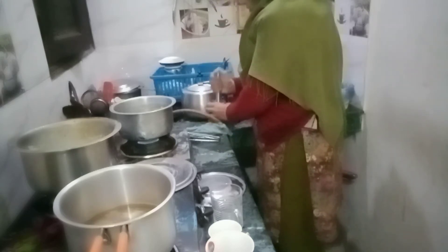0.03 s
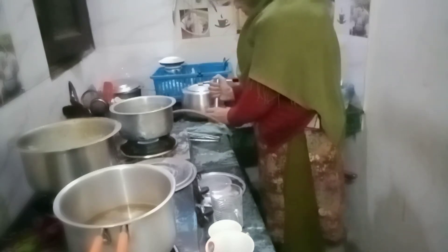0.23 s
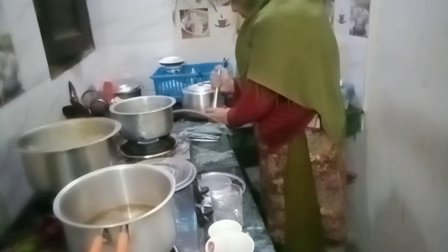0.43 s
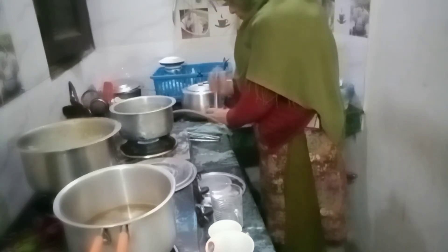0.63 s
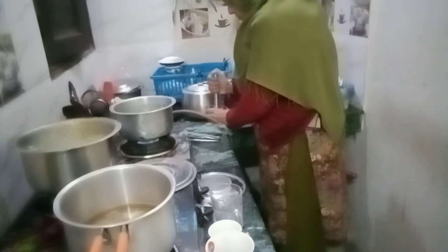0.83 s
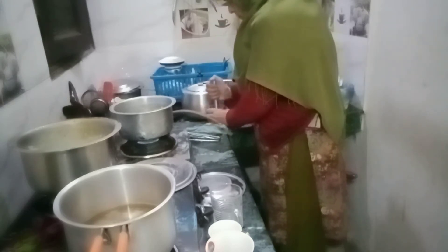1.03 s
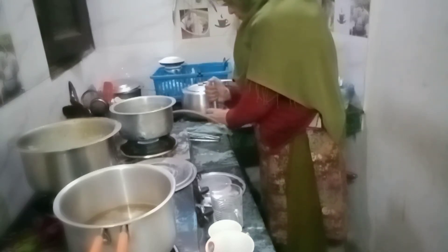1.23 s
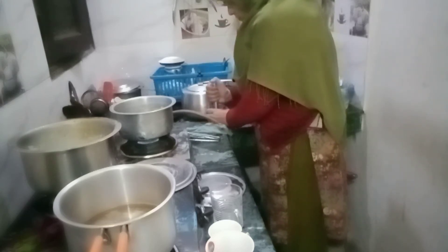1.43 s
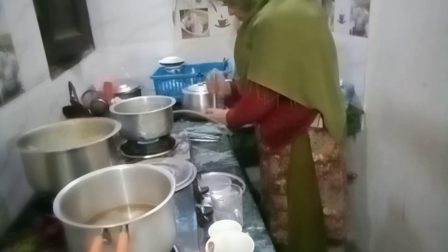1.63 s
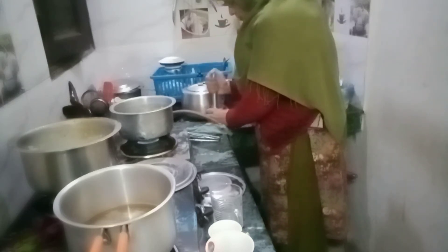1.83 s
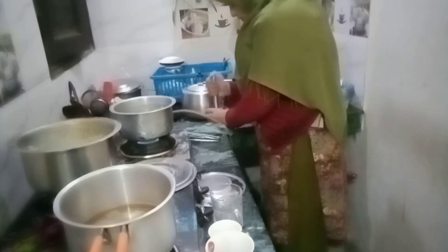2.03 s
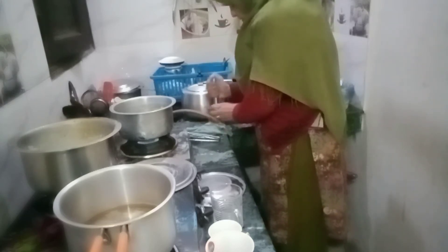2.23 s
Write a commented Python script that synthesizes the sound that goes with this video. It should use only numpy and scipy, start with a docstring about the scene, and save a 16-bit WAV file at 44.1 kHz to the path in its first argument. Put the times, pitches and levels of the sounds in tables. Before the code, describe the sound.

A metal pestle works in a small metal mortar, a couple of metres away. It clinks at 0.1 seconds, knocks hard at 0.2, then clinks twice more. From 0.7 to 2.2 seconds it pounds spices seven times, about four a second: dull thuds with short crunches, three led by clinks between 1.2 and 1.7 seconds. The small tiled kitchen echoes briefly over a faint hum.

```python
"""Pestle and mortar in a kitchen

A metal pestle works in a small metal mortar on a counter, a couple of metres away. It clinks on the
rim and knocks hard once, then pounds spices about four times a second: dull thuds with a short crunch,
some led by a clink on the way down. The small tiled kitchen answers every blow over a faint hum."""
import sys
import numpy as np
from scipy import signal
from scipy.fft import rfft, irfft, next_fast_len
from scipy.io import wavfile

SR = 44100
rng = np.random.default_rng(int(sys.argv[2]) if len(sys.argv) > 2 else 0)


def store_wav(level_fs):
    """Save 16-bit WAV to argv[1]."""
    pcm = np.round(np.clip(np.atleast_2d(level_fs), -1, 1) * 32767)
    wavfile.write(sys.argv[1], SR, pcm.T.astype(np.int16))


N = 101429
HIT_SAMPLES = SR * 3 // 4
T = np.arange(HIT_SAMPLES) / SR

# Room tone spectrum: freq_hz, level_db
AIR_SPECTRUM = [(25, -22), (45, -6.5), (70, -6), (100, -8), (170, 4), (300, -7.5), (600, -10),
                (1200, -13.5), (2500, -17.5), (4000, -26.5), (6500, -21.5), (9000, -32), (13000, -47),
                (15500, -35)]
# Decay of the kitchen's reverb: freq_hz, t60_s
KITCHEN_DECAY = [(100, 0.25), (300, 0.61), (800, 0.22), (2000, .26), (3500, 0.23), (6500, 0.23),
                 (14000, 0.23)]
# Early reflections off the nearest walls: delay_s, gain
WALL_ECHOES = [(.0055, .9), (.0075, .7), (.0108, .6), (.0172, .5)]

# Resonances: pitch_hz, level_db, t60_s
BUMP_MODES = [(169, 0, .55), (116, -10, .3)]  # the counter, softly bumped
THUMP_MODES = [(208.4, -9.5, 0.4), (238, -7.5, 0.39), (261, -4, 0.2), (289, -7, 0.13), (330, -9.5, 0.37),
               (263.2, 2, 0.097)]  # the low thump of a blow, ringing on in the room
BOOM_MODES = [(114.4, 9, 0.6), (115, 5.5, 0.29), (143.7, -1, 0.6)]  # the kitchen's low end
SWELL_MODES = [(134.5, -4.5, 0.12), (194, -7, 0.078)]  # the boom's brief second swell
MORTAR_MODES = [(856, -8, .2), (1003, -3, .2), (1025, -3, .18), (1080, 0, .16), (1118, 2, .17),
                (1213, -2, .2), (1298, -2, .2), (1436, -3, .18), (1490, -6, .22), (1671, -1, .18),
                (1910, -4, .18), (2060, -7, .2), (2519, -5, .2), (2692, -4, .22), (2920, -6, .2),
                (3335, -3, .18)]  # the mortar on the counter
PESTLE_MODES = [(3432, 0, .12), (3465, -8, .26), (3515, -2, .09), (3750, -13, .08), (3930, -18, .08),
                (6850, -7, .012), (9200, -11, .012), (11570, -25, .01), (14240, -19, .012)]  # the pestle, damped by the hand

# Tone colours of the contacts: freq_hz, level_db
CRACK_SPECTRUM = [(50, -65.5), (115, -16.5), (450, -20), (1100, -4), (2200, -10), (3600, -2), (4500, -12.5),
                  (7200, -19), (9000, -37.5), (12500, -48.5), (15500, -45)]  # a hard knock
BITE_SPECTRUM = [(1000, -38), (4500, -29.5), (5700, 3), (6800, 1.5), (7700, -20), (15000, -39.5)]  # first touch of metal on metal
CLICK_SPECTRUM = [(30, -52.5), (150, -30), (400, -14.5), (1000, 1), (1700, -0.5), (2400, 7.5), (3000, 2.5),
                  (3600, 12.5), (4300, -4.5), (5300, -3), (6800, -2), (7700, -27.5), (10500, -34),
                  (15500, -36)]  # pestle on rim
CLACK_SPECTRUM = [(30, -38), (70, -11), (150, 4), (300, 3.5), (410, -0.5), (550, 0), (800, 4.5), (930, -5),
                  (1170, -1), (1550, -6), (1900, -14), (2600, -6), (4000, -26), (10000, -37)]  # pestle into the filled bowl
CRUNCH_SPECTRUM = [(300, -25), (1500, -23.5), (3000, -6), (5000, 1), (6500, 6), (8500, -4), (11000, -7),
                   (13200, -10), (15400, 4), (16500, 5.5)]  # grains breaking

# The mortar is knocked and rocks: start_s, level_db, tilt_db_per_octave
KNOCK_CUES = [(.2230, -30, 0), (0.2279, -25.5, -0.5), (0.384, -43, 2), (0.39, -49, 0.5), (0.535, -51, 0.5)]
# Pestle on rim: start_s, click_db, click_tilt_db_per_octave, ring_db, middle_boost_db, top_boost_db
CLINK_CUES = [(.0970, -38.5, 1.5, -37.5, 10, -14), (0.3429, -34.5, -1, -31, -8.5, 8),
              (0.4959, -41.5, -2.5, -42.5, 8.5, 16), (1.2150, -40, -0.5, -35.5, 2.5, 2),
              (1.4412, -39.5, -0.5, -36, 9, 10), (1.687, -43, -1.5, -41, 3.5, 2)]
# Pestle into spices: start_s, boom_db, thump_db, clack_db, ring_db, crunch_db, crunch_tilt_db_per_octave
POUND_CUES = [(0.7453, -46.5, -44.5, -39.5, -41.5, -48, 0.5), (1.0075, -51, -49.5, -45.5, -52.5, -53, -7),
              (1.2589, -44, -36.5, -40, -44, -44.5, -2.5), (1.5040, -43, -33, -41.5, -49.5, -47.5, -2.5),
              (1.7460, -44, -34.5, -41, -45.5, -43.5, -6), (1.9840, -44, -33.5, -46.5, -48.5, -43, -1),
              (2.201, -51, -44, -49, -75.5, -47.5, -1)]

AIR_DB, HUM_DB, HUM_HZ = -60, -64, 100
TAIL_DB, TAIL_RISE_S = 8.5, 0.0013  # reverb tail, ahead of each sound's wet_db send
BUMP_S, BUMP_DB = 0.1, -55
RING_RISE_S = 0.0015
MORTAR_VS_CRACK_DB, BITE_VS_CLICK_DB = -3, -11.5
CUSHION_HZ = 1300  # the spices soften the blow above this
PRESSED_DECAY = 0.44  # share of the mortar's ring time left while the pestle presses on it
SWELL_DELAY_S, SWELL_VS_BOOM_DB = 0.077, -1
RUMBLE_CUT_HZ, BAND_LIMIT_HZ = 80, 15850


def amp(db):
    """Decibels to gain."""
    return 10 ** (np.asarray(db) / 20)


def curve_at(points, hz):
    """Read a (freq_hz, value) curve on a log frequency axis."""
    freqs, values = np.transpose(points)
    return np.interp(np.log(hz + 1), np.log(freqs + 1), values)


def tilted(spectrum, db_per_octave):
    """Tilt EQ: a spectrum made brighter or duller."""
    return [(hz, db + db_per_octave * np.log2(hz / spectrum[0][0])) for hz, db in spectrum]


def unit_hit(x):
    """Scale a hit to rms 1 over its first 50 ms."""
    return x / np.sqrt(np.mean(x[:SR // 20] ** 2) + 1e-20)


def add(track, start_s, x):
    """Mix x into the track at its cue."""
    part = track[round(start_s * SR):][:len(x)]
    part += x[:len(part)]


def contact(spectrum):
    """One transient: the tightest causal pulse with this spectrum."""
    size = 4096
    gains = amp(curve_at(spectrum, np.fft.rfftfreq(size, 1 / SR)))
    cepstrum = irfft(np.log(gains))
    cepstrum[1:size // 2] *= 2  # fold to minimum phase
    cepstrum[size // 2 + 1:] = 0
    return irfft(np.exp(rfft(cepstrum)))


def shower(spectrum, t60_s, spikiness):
    """A dying shower of tiny contacts, all of one colour."""
    noise = rng.standard_normal(HIT_SAMPLES)
    envelope = np.exp(spikiness * rng.standard_normal(HIT_SAMPLES) - np.log(1000) * T / t60_s)
    return signal.fftconvolve(noise * envelope, contact(spectrum))


def ring(modes, rise_s, scatter_db):
    """Damped modes, struck with a slightly different balance each time."""
    hz, db, t60 = np.transpose(modes)[:, :, None]
    level = amp(db + scatter_db * rng.standard_normal(db.shape))
    partials = level * np.exp(-np.log(1000) * T / t60) * np.sin(2 * np.pi * hz * T)
    return partials.sum(0) * (1 - np.exp(-T / rise_s))


def room_tone():
    """The bed: soft, dark noise and an electrical hum."""
    colour = amp(curve_at(AIR_SPECTRUM, np.fft.rfftfreq(N, 1 / SR)))
    air = irfft(rfft(rng.standard_normal(N)) * colour, N)
    hum = np.sqrt(2) * np.sin(2 * np.pi * HUM_HZ * np.arange(N) / SR)
    return amp(AIR_DB) * air / air.std() + amp(HUM_DB) * hum


def kitchen(x, wet_db):
    """A hit in the tiled room: direct sound, wall echoes and a diffuse tail, scaled to unit level."""
    hz, t, noise = signal.stft(rng.standard_normal(HIT_SAMPLES), SR, nperseg=256)
    decay = np.exp(-np.log(1000) * t / curve_at(KITCHEN_DECAY, hz)[:, None])
    tail = signal.istft(noise * decay, SR, nperseg=256)[1][:HIT_SAMPLES]
    tail *= 1 - np.exp(-T / TAIL_RISE_S)
    response = amp(TAIL_DB) * tail / np.linalg.norm(tail)
    for delay_s, gain in WALL_ECHOES:
        delay_s *= 1 + 0.04 * rng.standard_normal()
        response[round(abs(delay_s) * SR)] += gain
    response *= amp(wet_db)
    response[0] += 1  # direct sound
    return unit_hit(signal.fftconvolve(x, response)[:HIT_SAMPLES])


def counter_bump():
    """The counter booms faintly as the work begins."""
    out = np.zeros(N)
    add(out, BUMP_S, amp(BUMP_DB) * unit_hit(ring(BUMP_MODES, rise_s=0.015, scatter_db=3.5)))
    return out


def mortar_knocks():
    """Each knock is a broad crack that sets the mortar ringing."""
    out = np.zeros(N)
    for start_s, level_db, tilt in KNOCK_CUES:
        crack = kitchen(contact(tilted(CRACK_SPECTRUM, tilt)), wet_db=-1)
        body = kitchen(ring(MORTAR_MODES, RING_RISE_S, scatter_db=1), wet_db=-14)
        add(out, start_s, amp(level_db) * (crack + amp(MORTAR_VS_CRACK_DB) * body))
    return out


def rim_clinks(middle_hz=5000, top_hz=10500):
    """Metal on metal: bite, click and the pestle's short ring, its overtones set by where it lands."""
    out = np.zeros(N)
    for start_s, click_db, tilt, ring_db, middle_db, top_db in CLINK_CUES:
        bite = shower(BITE_SPECTRUM, t60_s=0.0079, spikiness=0.16)
        add(out, start_s, amp(click_db + BITE_VS_CLICK_DB) * kitchen(bite, wet_db=-22.5))
        click = contact(tilted(CLICK_SPECTRUM, tilt))
        add(out, start_s, amp(click_db) * kitchen(click, wet_db=3.5))
        modes = [(hz, db + (top_db if hz > top_hz else middle_db if hz > middle_hz else 0), t60)
                 for hz, db, t60 in PESTLE_MODES]
        pestle = ring(modes, RING_RISE_S, scatter_db=1)
        add(out, start_s, amp(ring_db) * kitchen(pestle, wet_db=-5))
    return out


def thud(modes, rise_s):
    """The weight of a blow: low modes with the sub rolled off, at unit level."""
    low_cut = signal.butter(4, RUMBLE_CUT_HZ, "highpass", fs=SR, output="sos")
    return unit_hit(signal.sosfilt(low_cut, ring(modes, rise_s, scatter_db=1)))


def pounding():
    """Each cushioned blow thumps low, booms on in the room, clacks the bowl and crushes grains."""
    out = np.zeros(N)
    cushioned = [(hz, db - 10 * np.log10(1 + (hz / CUSHION_HZ) ** 6), t60 * PRESSED_DECAY)
                 for hz, db, t60 in MORTAR_MODES]
    for start_s, boom_db, thump_db, clack_db, ring_db, crunch_db, tilt in POUND_CUES:
        grains = shower(tilted(CRUNCH_SPECTRUM, tilt), t60_s=0.053, spikiness=1.34)
        add(out, start_s, amp(thump_db) * thud(THUMP_MODES, rise_s=0.0027))
        add(out, start_s, amp(boom_db) * thud(BOOM_MODES, rise_s=0.018))
        swell = thud(SWELL_MODES, rise_s=0.0044)
        add(out, start_s + SWELL_DELAY_S, amp(boom_db + SWELL_VS_BOOM_DB) * swell)
        add(out, start_s, amp(clack_db) * kitchen(contact(CLACK_SPECTRUM), wet_db=4.5))
        mortar = ring(cushioned, RING_RISE_S, scatter_db=2)
        add(out, start_s, amp(ring_db) * kitchen(mortar, wet_db=-2.5))
        add(out, start_s, amp(crunch_db) * kitchen(grains, wet_db=-6.5))
    return out


def scene():
    """All layers in one mono mix."""
    return (rim_clinks() + mortar_knocks() + pounding() + counter_bump() + room_tone())[None]


def record(dry):
    """A brick-wall low-pass takes off the very top."""
    size = next_fast_len(N + SR // 2)
    passband = np.fft.rfftfreq(size, 1 / SR) < BAND_LIMIT_HZ
    return irfft(rfft(dry, size) * passband, size)[:, :N]


dry = scene()
out = record(dry)
store_wav(out)
```